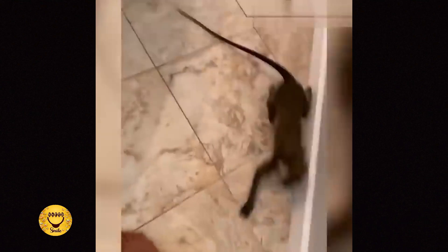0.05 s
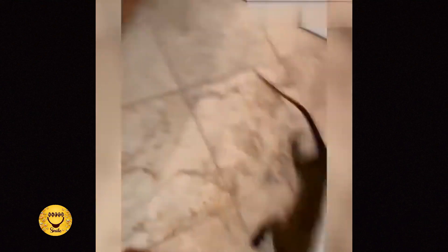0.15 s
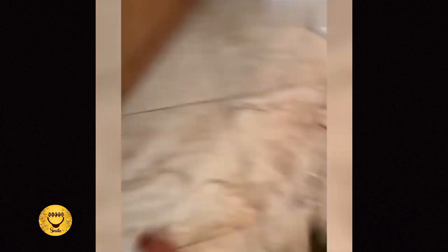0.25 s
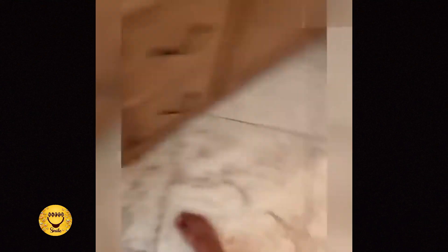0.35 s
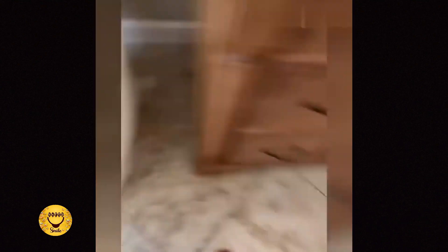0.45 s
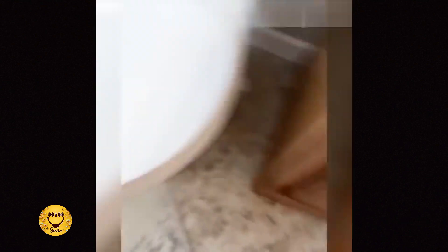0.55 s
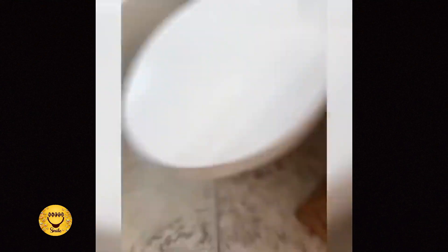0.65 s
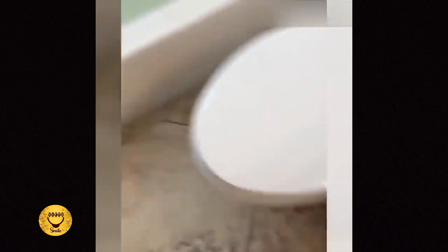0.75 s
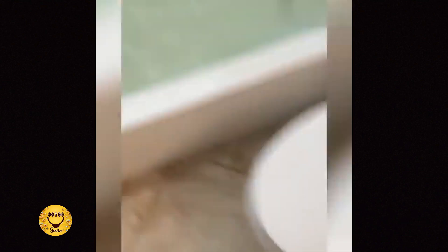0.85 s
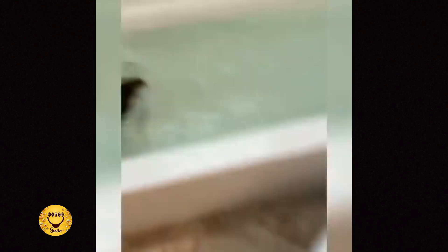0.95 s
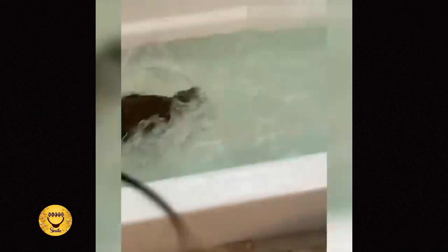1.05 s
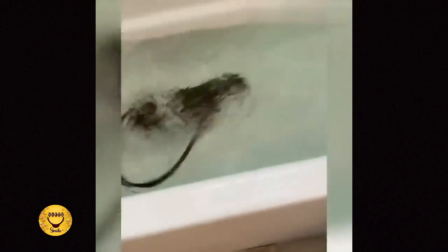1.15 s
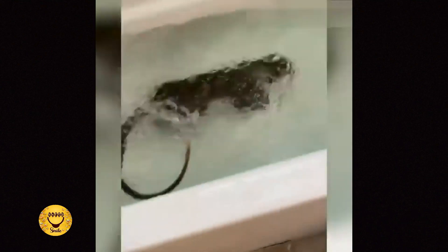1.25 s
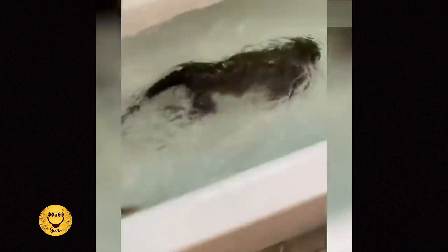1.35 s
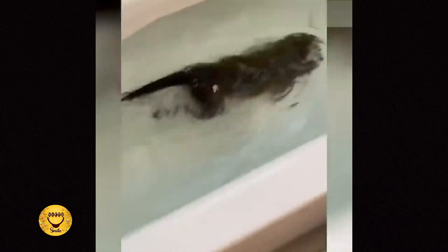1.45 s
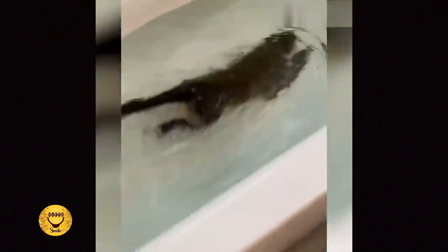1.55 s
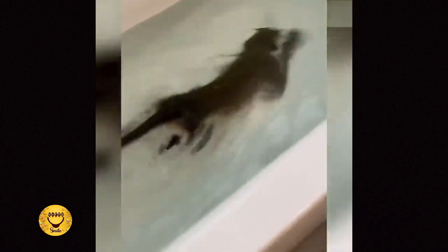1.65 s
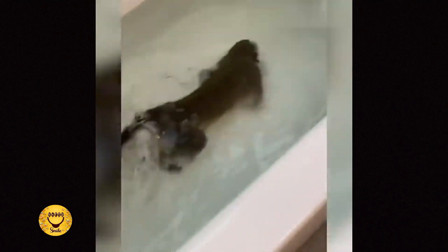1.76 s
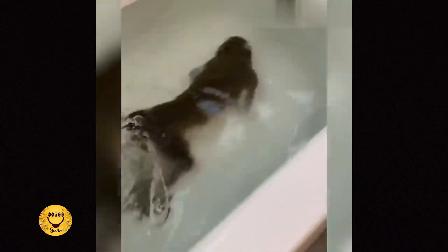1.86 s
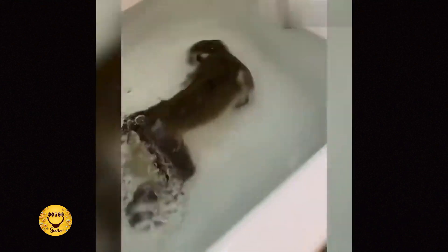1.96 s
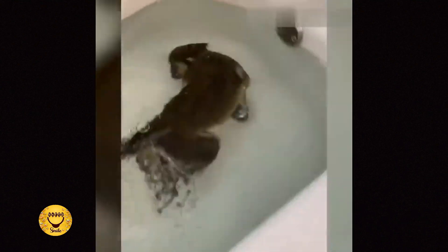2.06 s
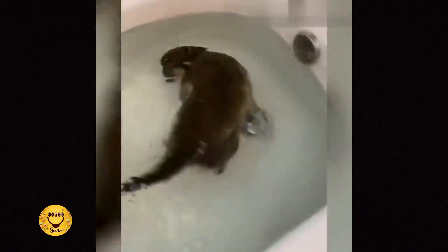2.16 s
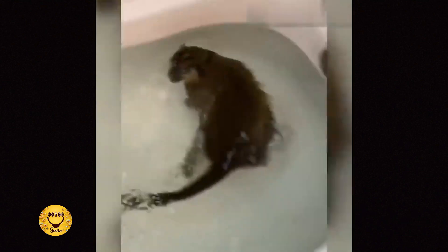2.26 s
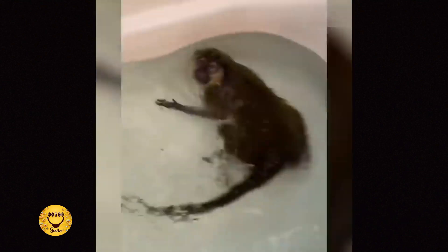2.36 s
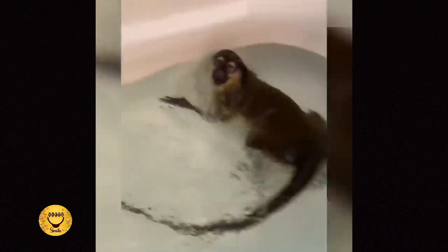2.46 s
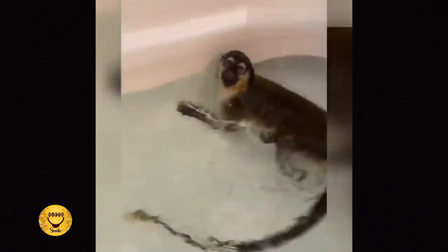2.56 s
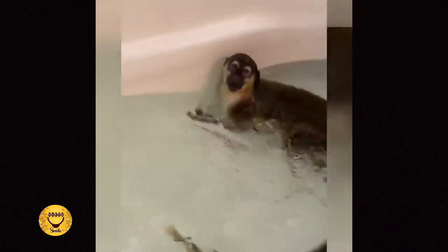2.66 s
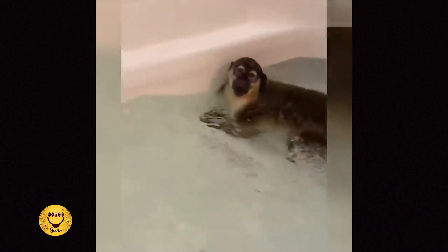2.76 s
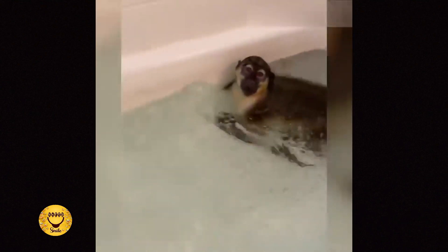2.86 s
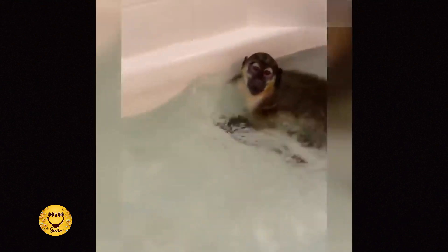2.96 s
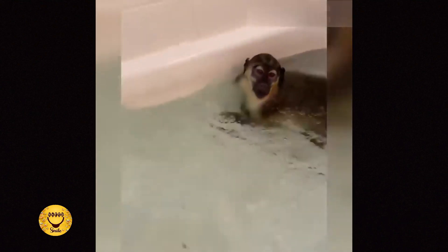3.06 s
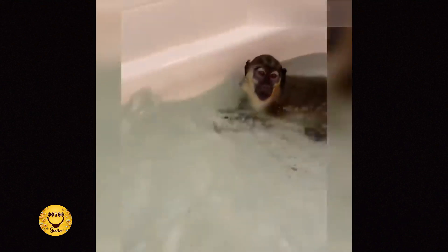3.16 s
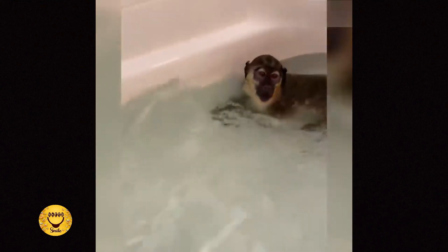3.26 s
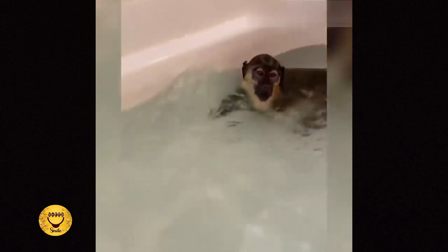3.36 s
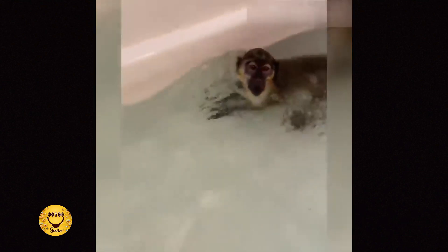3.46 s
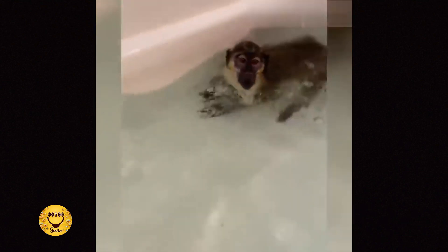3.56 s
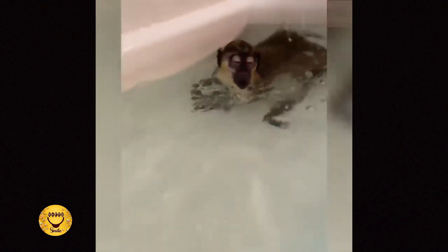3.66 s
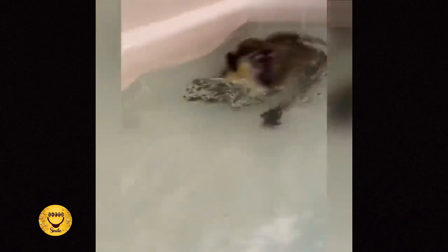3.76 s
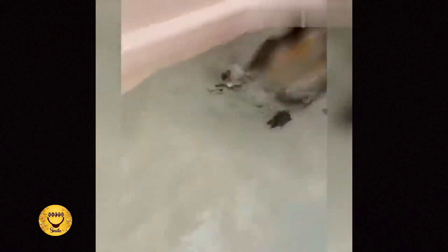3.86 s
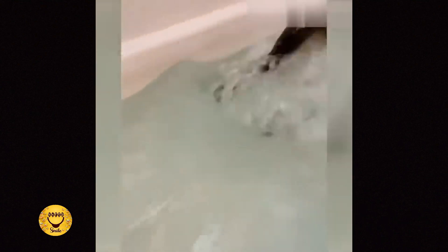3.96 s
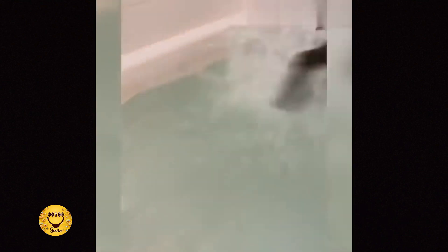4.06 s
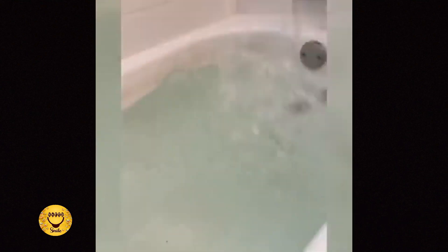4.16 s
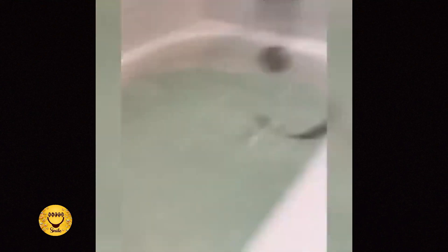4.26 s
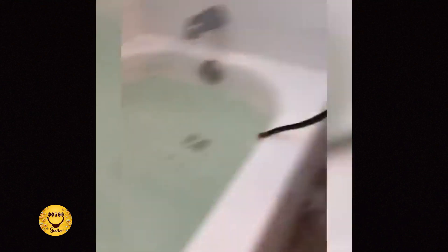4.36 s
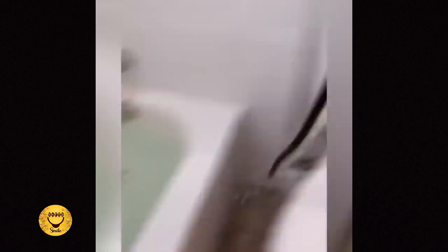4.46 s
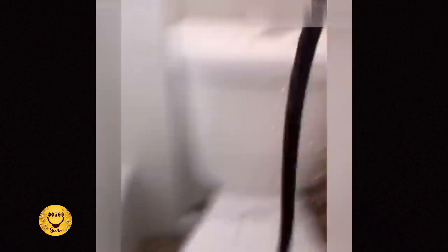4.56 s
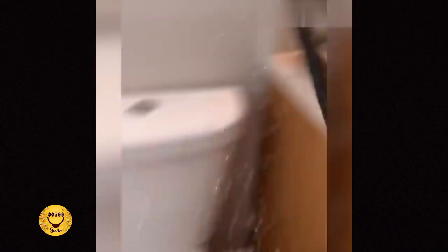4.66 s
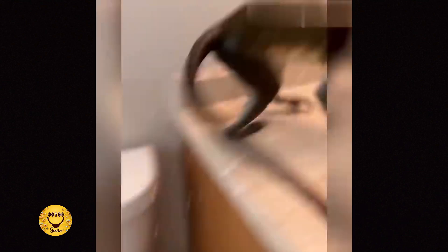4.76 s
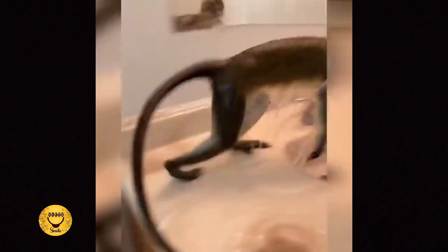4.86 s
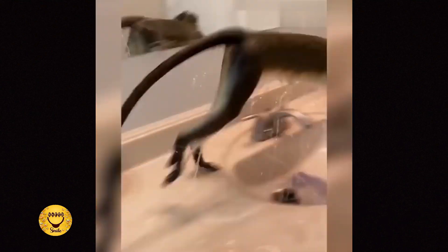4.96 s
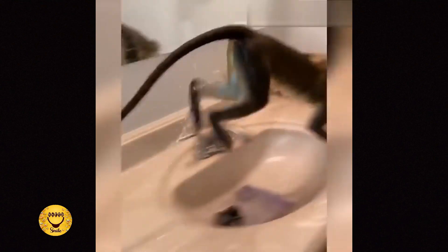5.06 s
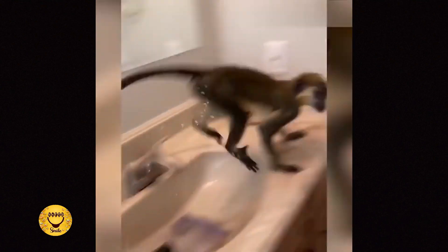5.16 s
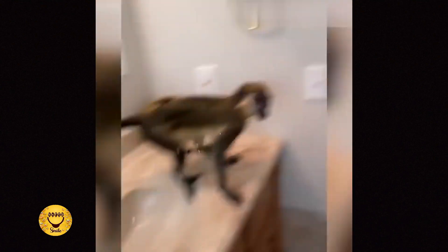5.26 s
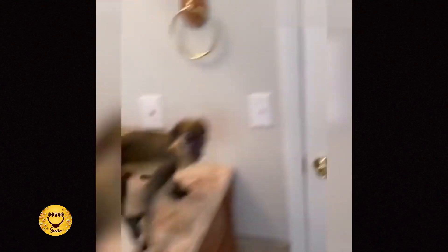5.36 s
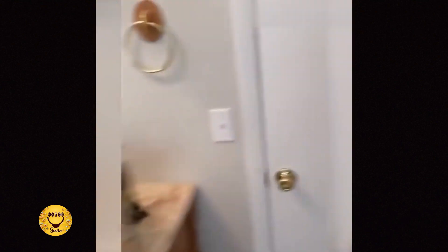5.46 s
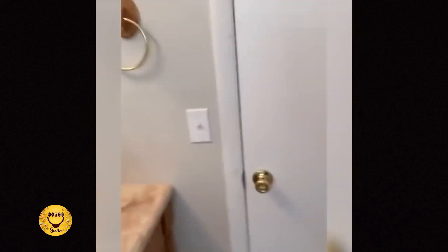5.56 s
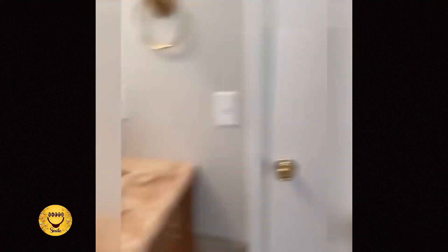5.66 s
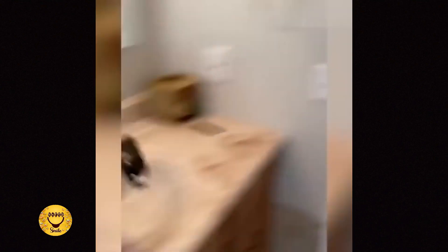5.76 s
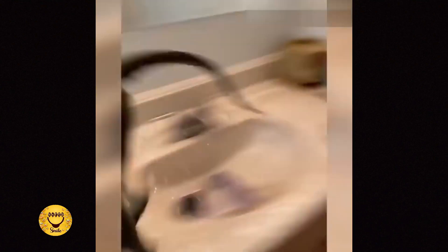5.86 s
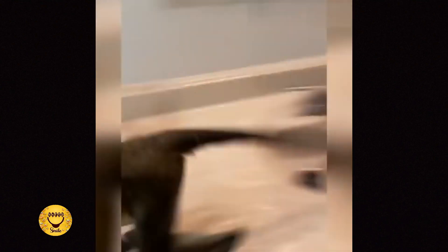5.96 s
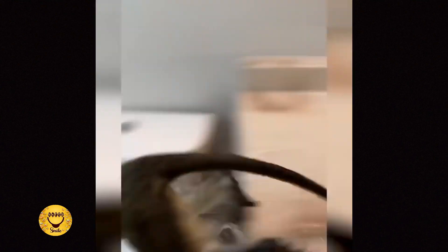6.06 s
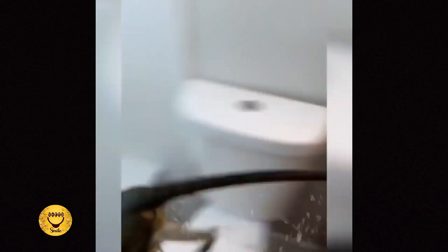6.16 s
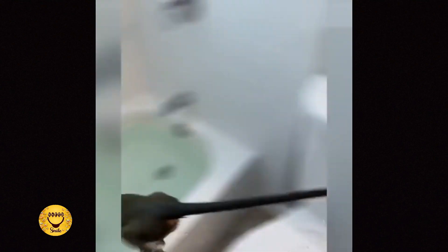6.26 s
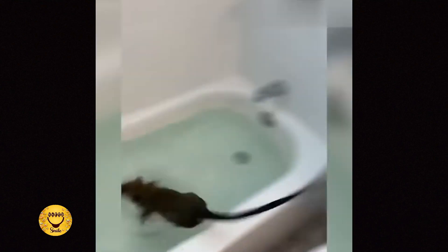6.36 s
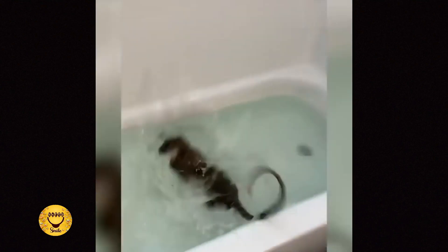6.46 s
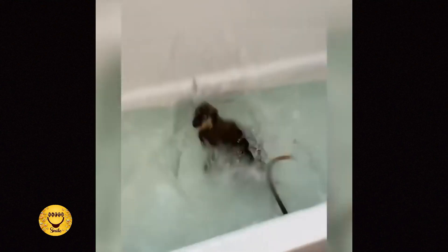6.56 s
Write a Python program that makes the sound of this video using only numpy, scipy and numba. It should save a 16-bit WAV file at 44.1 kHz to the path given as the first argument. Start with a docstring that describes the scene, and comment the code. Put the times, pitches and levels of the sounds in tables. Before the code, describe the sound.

Bathwater laps softly in a small, hard bathroom with a short echo, along with a light patter of drops. At about 0.8 seconds a small monkey jumps into the tub with a splash and several hollow thumps. It wades with sloshes, gurgles, plops and wet slaps that ease off by 2.5 seconds. A quieter stretch of dripping and trickling follows. Near 3.9 seconds the animal bursts out in a splash and a shower of spray. From 4.3 to 6.2 seconds its wet feet thump on the tub and bound across a hollow wooden vanity, with brief rattles, scattered drops and a couple of faint ringing knocks, while the bath keeps sloshing. At 6.4 seconds it dives back in with the loudest splash and deep thuds from the tub. The hand-held microphone gives a low rumble that swells with the quick moves.

```python
"""A bath laps in a small, hard bathroom. A small monkey jumps in, wades, then rests dripping.
At about 4 s it bursts out in a shower of spray and thumps and clatters across the wooden vanity
on wet feet. At 6.4 s it dives back in with a loud splash. Throughout, the water is clouds of
ringing bubbles coloured by the hollow tub, and the hand-held microphone rumbles as it follows."""
import sys
import numpy as np
from scipy import signal
from scipy.fft import rfft, irfft, next_fast_len
from scipy.io import wavfile
from scipy.ndimage import map_coordinates
from numba import njit

SR = 44100
rng = np.random.default_rng(int(sys.argv[2]) if len(sys.argv) > 2 else 0)


def int16_out(signal):
    """Quantize to a 16-bit WAV file."""
    q = np.round(np.clip(np.atleast_2d(signal).T, -1, 1) * 32767)
    wavfile.write(sys.argv[1], SR, q.astype(np.int16))


N = 291967

# Reverb time of the bathroom: frequency_hz, t60_s
BATHROOM_DECAY = [(100, 0.55), (400, 0.59), (1500, 0.75), (5000, 0.48), (13000, 0.14)]
# Each move stirs the bath, from the first lapping through jump, wade, rest and leap to the dive:
# start_s, rise_s, hold_s, release_s, gulp_db, slosh_db, splatter_db, spray_db
BATH_SURGES = [(-.05, 0.038, 0.018, 0.68, -54.5, -49.5, -60, -65),
               (0.285, 0.27, 0.25, 0.44, -55, -46.5, -58.5, -56.5),
               (0.636, 0.03, 0.071, 0.28, -44, -40.5, -49.5, -50),
               (0.8, 0.056, 0.039, 1.5, -37.5, -36, -32, -27.5),
               (0.901, 0.12, 0.019, 0.55, -37, -19.5, -28, -48),
               (1.08, 0.28, 0.15, 1.19, -51.5, -32, -35.5, -36.5),
               (1.445, 0.012, 0.016, 0.18, -43, -57, -58, -73),
               (1.695, 0.016, 0.15, 1.5, -74, -42.5, -44.5, -42.5),
               (2.063, 0.07, 0.085, 0.64, -53, -42, -57, -61),
               (2.426, 0.019, 0.034, 0.78, -78, -74, -49.5, -51.5),
               (3.28, 0.22, .15, .4, -69, -62, -72, -70), (3.634, 0.36, 0.3, 0.54, -66, -45.5, -45.5, -39),
               (3.878, 0.011, 0.13, 1.58, -70, -36.5, -33, -31),
               (4.018, .18, 0.1, 0.8, -38, -33.5, -34, -27), (4.607, 0.95, 0.25, 1.5, -54, -47, -57, -50),
               (6.391, 0.0062, 0.018, 0.24, -27.5, -24, -22.5, -28.5),
               (6.394, 0.025, 0.067, 0.45, -23, -22.5, -45, -39),
               (6.52, 0.047, 0.06, .3, -38, -33, -32, -35)]
# Steepness of a surge's release: gulp_exponent, slosh_exponent, splatter_exponent, spray_exponent
RELEASE_CURVES = (2.26, 2.4, 3.04, 2.37)
# Drops flung from the wet coat patter down: start_s, spray_db, splatter_db
COAT_SHOWERS = [(-.07, -40, -52.5), (.37, -54, -66), (.73, -46, -49), (.868, -35, -53), (1.697, -54, -61),
                (2.1, -69, -70.5), (2.942, -55, -64.5), (3.28, -52, -62.5), (3.748, -58, -78),
                (4.73, -33, -51.5), (5.0, -40.5, -48.5), (5.221, -41, -51.5), (5.61, -54, -77),
                (5.853, -42, -48.5), (5.966, -41.5, -48.5), (6.24, -43.5, -57), (6.345, -31, -38)]
# EQ on the spray, with a deep notch near 10 kHz: frequency_hz, level_db
SPRAY_EQ = [(1200, -53), (1900, -7.5), (2800, 0.5), (4500, -1.5), (6300, 0), (7200, -4), (8200, -15),
            (10300, -83), (12500, -5), (15500, -10)]
# High hiss, with a deep EQ notch near 10 kHz: frequency_hz, level_db
HISS_EQ = [(5000, -11), (8000, 3.5), (8600, 0), (9500, -99), (11000, -10.5), (12400, 12.5), (14000, 2.5),
           (15600, 2.5)]
# Tub resonances, plus a narrow EQ dip near 780 Hz: centre_hz, width_hz, gain_db
TUB_PEAKS_AND_DIP = [(160, 5.6, 4), (231.5, 9.9, 9.5), (283, 16, 8), (393, 8.9, 9.5), (454, 9.3, 8.5),
                     (598, 13, 0.5), (614, 6.4, 4.5), (782, 29, -5.5), (1207, 8.8, 0.5), (1660, 35, 4.5),
                     (2290, 310, 4)]
# Fader ride of the microphone's handling noise: time_s, level_db
HANDLING_RIDE = [(0.0, -55.5), (.58, -51.5), (.8, -39), (.94, -40), (1.16, -29.5), (1.38, -48.5),
                 (2.6, -49.5), (2.75, -57.5), (3.4, -53), (4.12, -40), (4.3, -31.5), (4.75, -35),
                 (4.97, -67), (5.1, -34.5), (5.27, -44), (5.4, -50), (5.6, -44), (6.1, -47), (6.5, -26.5)]
# Low rumble of the hand on the microphone: frequency_hz, level_db
RUMBLE_EQ = [(20, -15), (40, -1), (66, 9.5), (100, 7.5), (160, -11.5), (280, -3.5), (500, -41), (1200, -74)]
# Feet and body land on the tub and the vanity: start_s, level_db, pitch_hz, t60_s
THUMP_CUES = [(.004, -43, 250, 0.092), (.638, -31.5, 208, 0.055), (0.741, -38, 126, 0.28),
              (0.741, -40, 304, 0.25), (.839, -22.5, 150.6, 0.12), (0.895, -21.5, 145, 0.065),
              (0.935, -24, 120, .05), (0.967, -23, 130, 0.045), (4.266, -24.5, 89.4, 0.2),
              (4.261, -25.5, 226.6, 0.18), (4.389, -26.5, 196.4, 0.22), (4.549, -19.5, 165, 0.049),
              (4.571, -21.5, 75, 0.086), (4.668, -30, 156, 0.17), (4.69, -32, 87, 0.11),
              (4.735, -26.5, 76, 0.1), (4.783, -24.5, 61, 0.083), (4.788, -35, 169, 0.075),
              (5.117, -33.5, 391, 0.17), (5.237, -25, 165, 0.04), (5.245, -35, 337, 0.15),
              (5.275, -31, 222.4, 0.3), (5.521, -42, 279, 0.17), (5.616, -33, 137, 0.082),
              (5.662, -45, 359.7, 0.3), (5.975, -25.5, 79, 0.066), (6.22, -26, 57.5, 0.095),
              (6.422, -17.5, 266, 0.18), (6.463, -14.5, 209, 0.068), (6.5, -19.5, 273, 0.079)]
# Wet limbs hit water, tub and counter: start_s, level_db, smack_vs_crack_db, hiss_vs_crack_db, t60_s
SLAP_CUES = [(.375, -43.5, -8, 5.5, 0.26), (0.733, -40, -2, 8, 0.21), (0.8259, -28, 6, -25, 0.071),
             (.833, -18, 3, -26, 0.005), (0.877, -28, -12, -13, 0.051), (1.098, -16, 1, -18, 0.051),
             (1.701, -23, 0.5, -20, 0.068), (2.53, -49, 20.5, -6, 0.0083), (2.612, -41, 2, 2, 0.062),
             (3.28, -37.5, -33, -8, 0.029), (3.7102, -38, 1.5, 3.5, 0.019), (3.912, -22, -1.5, -14, 0.2),
             (3.927, -25.5, -20, -7, 0.069), (5.012, -37, -2.5, -18, 0.029), (5.229, -31, -38, -5, 0.089),
             (5.858, -28.5, 1, 4.5, 0.026), (6.249, -31.5, -23, -6, 0.037), (6.344, -27, -10, 1, 0.31),
             (6.393, -12.5, -3, -13, 0.062), (6.4019, -24, 11.5, -10, 0.035)]
# Bright edge of a slap: frequency_hz, level_db
CRACK_EQ = [(1200, -45), (1900, 0.5), (2800, 1), (4500, 3.5), (6300, 2.5), (7200, -3.5), (8200, -7),
            (10300, -54), (15500, -41)]
# Duller body of a slap: frequency_hz, level_db
SMACK_EQ = [(200, -7), (450, -14), (800, 15.5), (1500, 9), (2600, 14.5), (5000, -46)]
# Single bubbles and drips, longest at the tub's resonances: start_s, level_db, pitch_hz, t60_s
PLOP_CUES = [(.654, -35, 320, 0.3), (0.826, -25.5, 402, 0.1), (.86, -37.5, 399, 0.52),
             (0.848, -30.5, 1188, 0.25), (.986, -17, 355, 0.11), (1.02, -24, 673, 0.1),
             (1.096, -22, 1418, 0.052), (1.209, -35.5, 448, 0.16), (1.312, -22.5, 1560, 0.029),
             (1.529, -30, 627, 0.064), (1.716, -36.5, 395.6, 0.43), (1.883, -38.5, 472.3, 0.19),
             (1.8, -43, 396, 0.4), (2.039, -37, 390, 0.49), (2.116, -29, 4397, 0.025),
             (2.249, -28, 819, 0.058), (2.249, -29.5, 623, 0.058), (2.462, -46, 475, 0.7),
             (2.51, -41, 3600, 0.033), (2.527, -32.5, 1206, 0.041), (2.53, -40.5, 2740, 0.042),
             (2.545, -41, 728, 0.16), (2.615, -39, 1500, 0.044), (2.801, -49, 1543, 0.046),
             (2.824, -48, 1610, 0.036), (2.98, -55, 2820, .03), (3.066, -50, 2960, .03),
             (3.287, -34.5, 2790, 0.04), (3.296, -34.5, 3530, 0.049), (3.32, -44, 2360, 0.078),
             (3.385, -42, 3530, .04), (3.71, -36, 737, 0.021), (3.768, -48, 3300, 0.071),
             (3.929, -24, 672, 0.054), (3.98, -14.5, 786, 0.031), (3.965, -21, 1290, 0.049),
             (4.345, -29, 579, 0.16), (4.352, -29.5, 1148, 0.14), (4.48, -24.5, 1340, 0.035),
             (5.015, -23.5, 3220, 0.011), (5.016, -23.5, 2310, 0.0093)]
# Handfuls of heavy drops hit the water or the counter: start_s, level_db, pitch_hz, length_s
SPATTER_CUES = [(0.876, -32, 4180, 0.056), (0.973, -28, 2600, 0.065), (1.1, -22, 4500, 0.035),
                (1.173, -32, 3020, 0.062), (1.703, -30.5, 3750, 0.018), (1.848, -34, 3200, 0.086),
                (3.927, -31, 3960, .03), (4.14, -38, 3200, 0.08), (4.319, -34, 2880, .07),
                (4.497, -41, 3600, 0.086), (5.029, -33, 2880, 0.082), (5.977, -31, 3300, 0.023),
                (6.425, -22, 3000, 0.048)]
# Air dragged under by a limb: start_s, level_db, pitch_hz, length_s, left_lean_share
GURGLE_CUES = [(1.025, -27.5, 557, 0.07, 0.4), (1.15, -36, 438, .06, 0.3), (1.468, -38, 344, .05, .2),
               (1.602, -42, 502, 0.044, .2), (2.17, -48, 650, 0.048, 0.1), (2.494, -43, 1220, 0.039, .3),
               (3.901, -30.5, 1170, 0.041, 0.71), (3.923, -29.5, 700, 0.024, 0.8),
               (3.961, -28.5, 1210, 0.029, 0.3), (4.001, -27, 1190, 0.064, 0), (4.021, -32, 634, 0.045, .1),
               (4.086, -33.5, 572, 0.04, 0), (4.102, -37, 1000, 0.071, .1), (4.221, -36.5, 935, .025, .1),
               (4.275, -26, 1890, 0.029, 0), (4.345, -33, 573, .06, .1), (4.421, -40, 950, 0.031, 0),
               (4.468, -40, 606, 0.034, 0), (6.419, -23.5, 1045, 0.053, 0.2), (6.555, -29, 466, 0.031, 0.2)]
# Fader ride of a faint, dark noise during the pause: time_s, level_db
PAUSE_NOISE_RIDE = [(2.62, -63), (2.8, -57), (3.1, -62), (3.3, -61), (3.56, -59)]
# Colour of that noise: frequency_hz, level_db
PAUSE_NOISE_EQ = [(30, -26), (70, 9.5), (160, -7), (500, -14), (1400, -6), (2400, -75)]
# Bounds across the vanity: start_s, level_db
BOUND_CUES = [(5.115, -48), (5.235, -44), (5.51, -46), (5.614, -40.5), (5.675, -45.5), (5.857, -40.5),
              (5.975, -55)]
# Boxy colour of the hollow cabinet: frequency_hz, level_db
CABINET_EQ = [(120, -11), (230, 5.5), (350, 7.5), (700, 0.5), (1500, -21.5), (3000, -37)]
# Hard knocks on the vanity: start_s, level_db
KNOCK_CUES = [(5.857, -41.5), (5.98, -48)]
# Modes of something standing on the vanity: pitch_hz, level_db, t60_s
RING_MODES = [(761, -1.5, 0.33), (1281, -5, 0.28), (1498, -0.5, 0.13), (1680, -2, 0.2), (1890, -5.5, 0.27)]
# Stereo width, as EQ on the side channel: frequency_hz, gain_db
SIDE_EQ = [(60, -36.5), (140, -22), (260, -13.5), (480, -3.5), (800, 4.5), (1400, 4.5), (2100, -2.5),
           (3200, -5), (5200, -5), (8000, -8), (13000, -12.5)]
# Stereo balance: frequency_hz, left_over_right_db
BALANCE_EQ = [(120, 0), (260, 0), (500, 1.5), (1000, 1.3), (2000, 0)]

LAPPING_DB, TRICKLE_DB = -93, -59.5  # the bath never lies still, the coat never stops running
CLUMP_DB, CLUMPS_PER_S = 2.5, 14  # bubbles come in clumps at each spot of the tub
HISS_FLICKER_DB, HISS_FLICKERS_PER_S = 3, 22  # the high hiss flickers randomly in level
TOP_HZ = 15850


def amp(db):
    """Decibels to gain."""
    return 10 ** (np.asarray(db) / 20)


def unit_rms(x):
    """Normalise to rms 1."""
    return x / np.sqrt(np.mean(x ** 2) + 1e-20)


def along(points, hz):
    """Read (frequency_hz, value) points on a log axis."""
    frequencies, values = np.transpose(points)
    return np.interp(np.log(hz + 1), np.log(frequencies + 1), values)


def fader(ride):
    """Gain per sample from (time_s, level_db) points, fading to silence outside them."""
    times, db = np.transpose(ride)
    return amp(np.interp(np.arange(N) / SR, np.r_[times[0] - .02, times, times[-1] + .1],
                         np.r_[-100, db, -100]))


def filtered(x, response):
    """Apply a frequency response to x."""
    n = x.shape[-1]
    padded = next_fast_len(n + 8192)
    return irfft(rfft(x, padded) * response(np.fft.rfftfreq(padded, 1 / SR)), padded)[..., :n]


def eq(points):
    """Response of an EQ curve drawn through (frequency_hz, level_db) points."""
    return lambda hz: amp(along(points, hz))


def band(low_hz, high_hz, order=5):
    """Response of a soft-edged band-pass."""
    return lambda hz: ((1 + (low_hz / (hz + 1)) ** (2 * order))
                       * (1 + (hz / high_hz) ** (2 * order))) ** -.5


def noise(colour, size):
    """Noise of rms 1, coloured by an EQ curve."""
    return unit_rms(filtered(rng.standard_normal(size), eq(colour)))


def add(out, start_s, x):
    """Mix x into out from start_s on."""
    part = out[:, round(start_s * SR):][:, :x.shape[1]]
    part += x[:, :part.shape[1]]


def room(x, wet_db, lean=0):
    """Mid and side of one spot in the bathroom: the direct sound, leaning left by the share `lean` (centred by
    default), and a fresh tail."""
    hz, t, spectrum = signal.stft(rng.standard_normal((2, SR // 2)), SR, nperseg=256)
    decay = amp(-60 * t / along(BATHROOM_DECAY, hz)[:, None])
    impulse = signal.istft(spectrum * decay, SR, nperseg=256)[1]
    impulse *= amp(wet_db) / np.linalg.norm(impulse[0])
    impulse[:, 0] += [1, lean]  # direct path
    impulse[1, rng.integers(20, 200)] += .5  # early reflection in the side channel
    return signal.fftconvolve(x[None], impulse, axes=1)


@njit
def ring_bubbles(starts, pitches, sizes, cycles, rise, n, sr):
    """Damped sines whose pitch climbs by the share `rise` as each bubble nears the surface."""
    out = np.zeros(n)
    for i in range(len(starts)):
        life = int(cycles * sr / pitches[i])
        for k in range(min(life, n - starts[i])):
            age = k / life
            phase = 2 * np.pi * cycles * age * (1 + rise * age / 2)
            out[starts[i] + k] += sizes[i] * np.exp(-6 * age) * np.sin(phase)
    return out


def cloud(low_hz, high_hz, cycles, spread_db, wet_db, colour, count):
    """A bed of mixed bubbles ringing at a few spots of the tub: mid and side, near rms 1."""
    out, spots = np.zeros((2, N)), 5
    n = N + SR // 2  # pre-roll: the water is already moving
    for _ in range(spots):
        when, pitch, chance = rng.random((count // spots, 3)).T
        starts = (when * n).astype(np.int64)
        hz = low_hz * (high_hz / low_hz) ** pitch
        sizes = hz * amp(-spread_db * np.log(chance + 0.014))  # a few are much louder than the rest
        clumps = map_coordinates(rng.standard_normal(size=400), [when * n / SR * CLUMPS_PER_S])
        sizes *= amp(CLUMP_DB * clumps)
        bubbles = ring_bubbles(starts, hz, sizes, float(cycles), rise=0.085, n=n, sr=SR)
        out += room(bubbles, wet_db)[:, n - N:n]
    out = filtered(out, colour)
    return out / np.std(out[0])


def swell(start_s, rise_s, hold_s, release_s, curve):
    """Attack, hold and release envelope; a higher curve dies away more steeply."""
    falling = np.linspace(0, 1, num=30)
    times = np.r_[start_s, start_s + rise_s + hold_s + release_s * falling]
    return np.interp(np.arange(N) / SR, times, np.r_[0, (1 - falling) ** curve])


def stirring():
    """Envelopes of gulp, slosh, splatter and spray: all surges and showers add up in power."""
    power = np.zeros((4, N))
    for start, rise, hold, release, *levels in BATH_SURGES:
        for layer, (db, curve) in enumerate(zip(levels, RELEASE_CURVES)):
            power[layer] += (amp(db) * swell(start, rise, hold, release, curve)) ** 2
    for start, spray_db, splatter_db in COAT_SHOWERS:
        patter = swell(start, rise_s=0.017, hold_s=0.02, release_s=0.62, curve=2.3)
        power[2:] += np.outer(amp([splatter_db, spray_db]), patter) ** 2
    power[1] += amp(LAPPING_DB) ** 2
    power[3] += amp(TRICKLE_DB) ** 2
    return np.sqrt(power)


def water():
    """Big pockets of air gulp, middling bubbles slosh and splatter, with spray and high hiss on top."""
    gulp, slosh, splatter, spray = stirring()
    pockets = cloud(110, 330, cycles=10, spread_db=1, wet_db=-3, colour=band(105, 340), count=1800)
    bubbles = cloud(310, 780, cycles=28, spread_db=3, wet_db=0, colour=band(300, 760), count=2100)
    splats = cloud(708, 2129, cycles=38, spread_db=5, wet_db=7.5, colour=band(760, 2060), count=3600)
    drops = cloud(1658, 7440, cycles=31.6, spread_db=4.5, wet_db=4.5, colour=eq(SPRAY_EQ), count=15000)
    splashing = (gulp * amp(-2.5) * pockets + slosh * amp(-7) * bubbles
                 + splatter * amp(-1) * splats + spray * amp(-0.5) * drops)
    # drips and hiss ride a compressed spray envelope, so they come forward as the splashing calms
    lingering = spray.max() * (spray / spray.max()) ** 0.81
    drips = cloud(1500, 6000, cycles=45, spread_db=3, wet_db=-1,
                  colour=band(1500, 3200, order=2), count=800)
    flicker = map_coordinates(rng.standard_normal(size=400), [np.arange(N) / SR * HISS_FLICKERS_PER_S])
    hiss = amp(HISS_FLICKER_DB * flicker) * np.array([noise(HISS_EQ, N), noise(HISS_EQ, N)])
    return splashing + lingering * (amp(-28.5) * drips + amp(-15) * hiss)


def tub_eq(hz):
    """Tub resonances that colour the water and ring on after it, plus a narrow EQ dip near 780 Hz."""
    response = amp(-2)
    for centre, width, db in TUB_PEAKS_AND_DIP:
        detune, loss = centre ** 2 - hz ** 2, 1j * hz * width
        response = response * (detune + loss * amp(db / 2)) / (detune + loss * amp(-db / 2))
    return response


def handling():
    """The moving hand makes the microphone rumble."""
    return fader(HANDLING_RIDE) * amp(-7) * np.array([noise(RUMBLE_EQ, N), noise(RUMBLE_EQ, N)])


def tone(hz, t60, attack_s, glide):
    """One dying resonance, its pitch bending towards hz * (1 + glide)."""
    t = np.arange(SR // 2) / SR
    bend = glide * (t - t60 * (1 - np.exp(-t / t60)))
    return np.sin(2 * np.pi * hz * (t + bend)) * amp(-60 * t / t60) * (1 - np.exp(-t / attack_s))


def thumps():
    """Soft landings: the struck panel booms, with a dull puff from the pad of the foot."""
    out, t = np.zeros((2, N)), np.arange(SR // 2) / SR
    for start, db, hz, t60 in THUMP_CUES:
        boom = tone(hz, t60, attack_s=0.002, glide=-0.081)
        pad = unit_rms(filtered(rng.standard_normal(len(t)), band(60, 290, order=3)))
        pad *= amp(-14.5 - 60 * t / (1.63 * t60)) * (1 - np.exp(-t / 0.0059))
        add(out, start, amp(db) * room(boom + pad, wet_db=-3.5))
    return out


def slaps():
    """A wet limb lands: a bright crack of spray and a high hiss over a duller smack."""
    out, t = np.zeros((2, N)), np.arange(SR // 4) / SR
    for start, db, smack_db, hiss_db, t60 in SLAP_CUES:
        crack = noise(CRACK_EQ, len(t))
        hiss = amp(hiss_db) * noise(HISS_EQ, len(t))
        smack = amp(smack_db) * noise(SMACK_EQ, len(t))
        attack_s = 0.024 * t60  # a flatter, shorter slap also bites more sharply
        envelope = amp(-60 * t / t60) * (1 - np.exp(-t / attack_s))
        add(out, start, amp(db - 6.5) * room((crack + hiss + smack) * envelope, wet_db=-.5))
    return out


def knot(hz, length_s, spread, cycles, count):
    """A handful of bubbles born one after another, scattered around hz by the share `spread`."""
    when, pitch, size = rng.random((count, 3)).T
    starts = ((np.arange(count) + when) / count * length_s * SR).astype(np.int64)
    pitches = hz * (1 + spread * (2 * pitch - 1))
    return ring_bubbles(starts, pitches, .5 + size, float(cycles), rise=0.05, n=SR // 2, sr=SR)


def plops():
    """Single bubbles ring out left of centre, bending up as they surface and shedding fainter ones."""
    out = np.zeros((2, N))
    for start, db, hz, t60 in PLOP_CUES:
        bubble = tone(hz, t60, attack_s=1.7 / hz, glide=0.166)
        satellites = amp(-17) * knot(hz, length_s=.022, spread=0.15, cycles=23, count=5)
        add(out, start, amp(db) * room(bubble + satellites, wet_db=-2.5, lean=0.25))
    return out


def spatters():
    """Heavy drops land close by, each a short tick on top of the splashing."""
    out = np.zeros((2, N))
    for start, db, hz, length_s in SPATTER_CUES:
        ticks = knot(hz, length_s, spread=0.43, cycles=7.4, count=6)
        add(out, start, amp(db) * room(ticks, wet_db=-3))
    return out


def gurgles():
    """Air dragged under by a stroke breaks into like-sized bubbles, panned along with their reverb."""
    out = np.zeros((2, N))
    for start, db, hz, length_s, lean in GURGLE_CUES:
        mid, side = room(knot(hz, length_s, spread=0.15, cycles=25, count=6), wet_db=-3.5)
        add(out, start, amp(db) * np.array([mid, lean * mid + (1 - lean) * side]))
    return out


def pause_noise():
    """Faint, dark noise during the pause, almost only in the side channel."""
    mid, side = amp(-32) * noise(PAUSE_NOISE_EQ, N), noise(PAUSE_NOISE_EQ, N)
    return fader(PAUSE_NOISE_RIDE) * np.array([mid, side])


def clatter(attack_s=0.0094, t60=0.22):
    """The hollow cabinet and its loose doors rattle briefly under each bound."""
    out, t = np.zeros((2, N)), np.arange(SR // 2) / SR
    envelope = amp(-60 * t / t60) * (1 - np.exp(-t / attack_s))
    for start, db in BOUND_CUES:
        add(out, start, amp(db) * room(noise(CABINET_EQ, len(t)) * envelope, wet_db=0))
    return out


def knocks():
    """Each hard knock sets something on the vanity ringing in the same few modes."""
    out = np.zeros((2, N))
    for start, db in KNOCK_CUES:
        ring = sum(amp(level) * tone(hz, t60, attack_s=.001, glide=0) for hz, level, t60 in RING_MODES)
        add(out, start, amp(db) * room(ring, wet_db=-2.5))
    return out


def narrowed(x, side_db):
    """Trim the side channel to pull a sound towards the centre."""
    return x * np.array([[1], [amp(side_db)]])


def scene():
    """The stereo mix: bass nearly mono, midrange wide and a little to the left."""
    wet_hits = narrowed(slaps() + spatters(), side_db=-1.5)
    body_hits = narrowed(thumps() + clatter() + knocks(), side_db=-1)
    bath = filtered(water(), tub_eq) + (plops() + gurgles())
    mid, side = bath + wet_hits + body_hits + handling()
    side = filtered(side, eq(SIDE_EQ))
    mid, side = np.array([mid, side]) + pause_noise()
    left_right = np.array([mid + side, mid - side])
    return filtered(left_right, lambda hz: amp(np.outer([.5, -.5], along(BALANCE_EQ, hz))))


def record(dry):
    """A brick-wall low-pass on the master."""
    return filtered(dry, lambda hz: hz < TOP_HZ)


dry = scene()
out = record(dry)
int16_out(out)
```